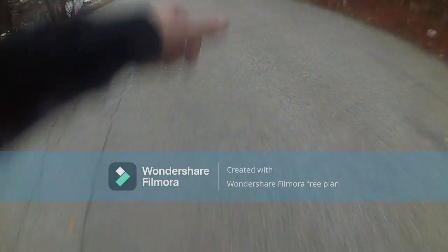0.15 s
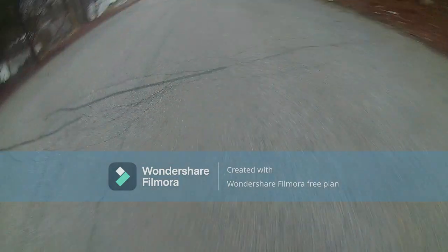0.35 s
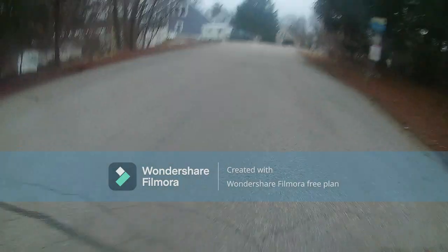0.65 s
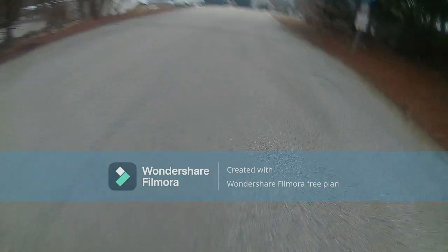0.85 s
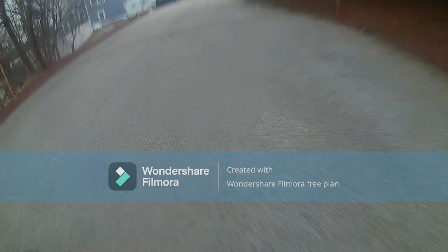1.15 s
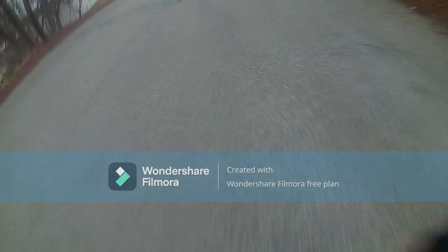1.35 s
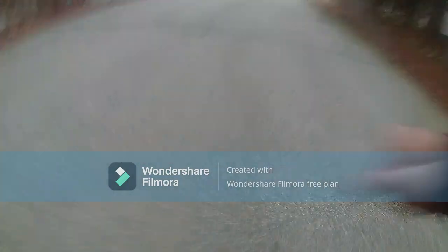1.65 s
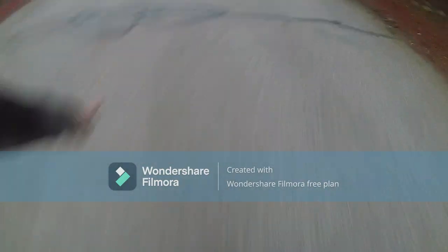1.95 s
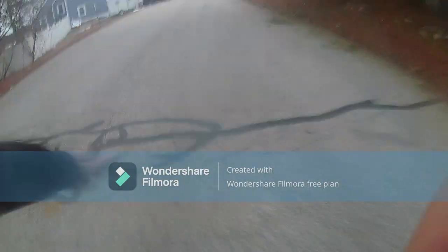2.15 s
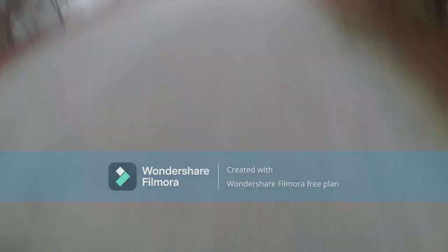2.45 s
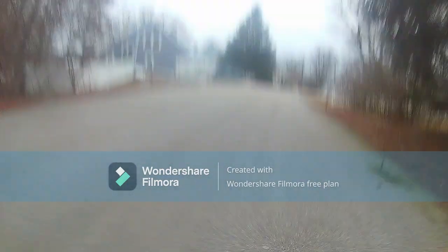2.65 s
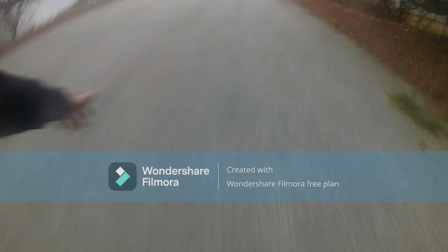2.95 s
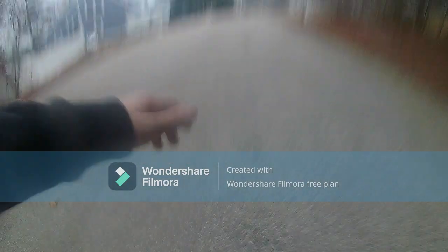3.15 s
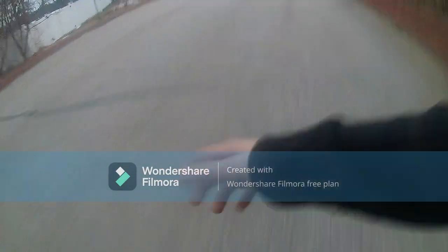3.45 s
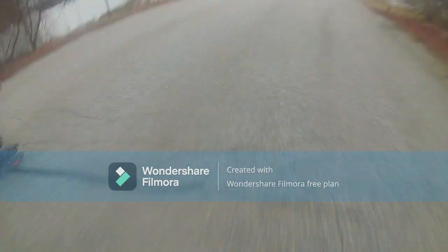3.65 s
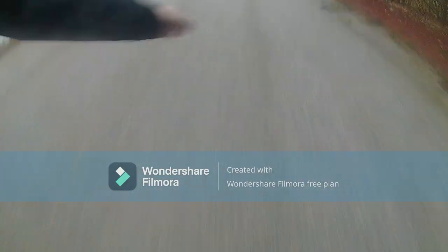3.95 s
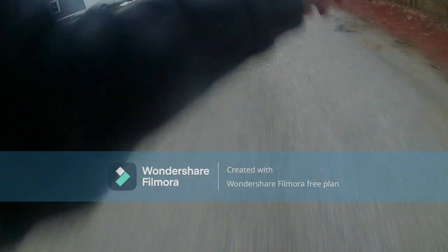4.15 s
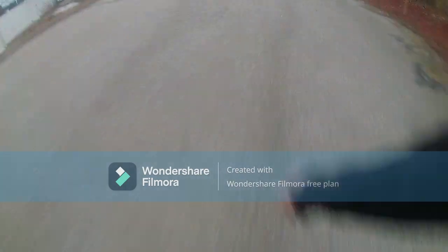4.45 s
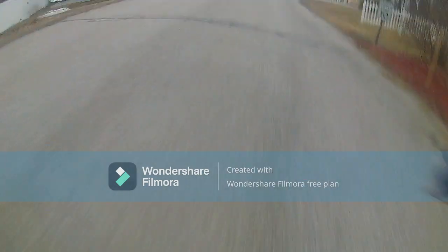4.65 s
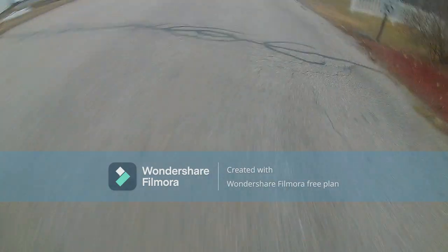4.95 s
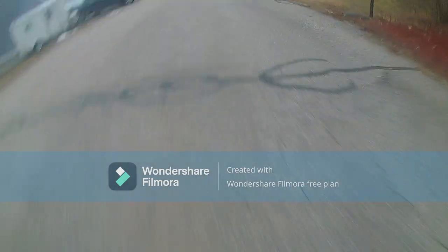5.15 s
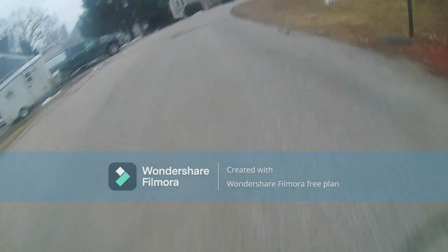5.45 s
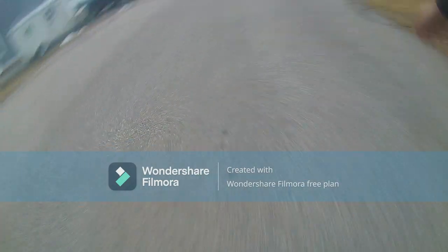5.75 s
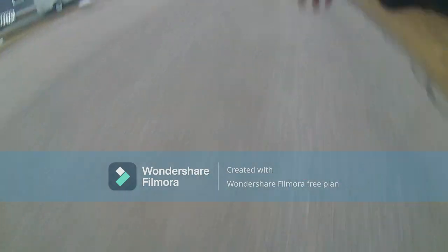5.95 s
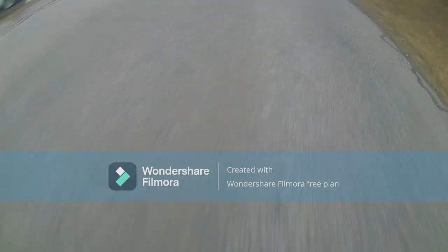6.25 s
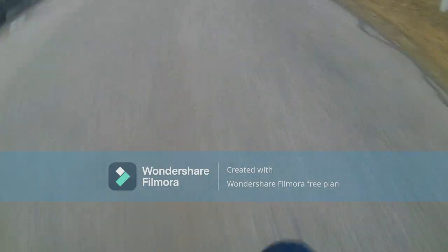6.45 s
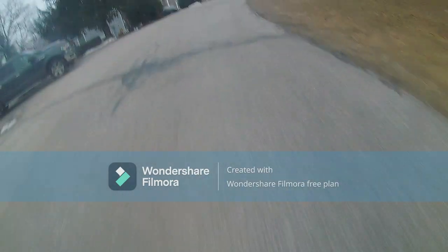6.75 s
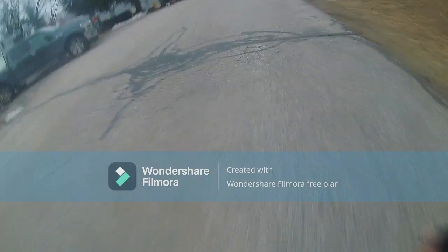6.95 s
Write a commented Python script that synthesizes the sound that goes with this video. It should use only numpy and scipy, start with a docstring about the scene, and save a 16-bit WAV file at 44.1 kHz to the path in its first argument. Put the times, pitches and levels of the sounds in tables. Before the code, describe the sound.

Inline skates roll fast over coarse outdoor asphalt, heard close and dry from a camera on the skater's body. A granular midrange roar is continuous, with bright fluttering sizzle swelling in pushes around 0.6, 1.4-2.4, 2.9, 3.7, 4.7 and 5.9 seconds, plus faint ticking stones. Brief scraping skids come near 0.6, 3.0, 4.55 and 6.3. Low air rumble gusts, strongest around 2.1-2.6. Dry thumps with hollow plastic clacks strike at 1.1 and 1.7; near 2.05 a loud cloth scrape and rapid chatter meet a swell of roar over cracks, with jolts continuing to a clipped blow at 2.53. Another hard clack hits at 2.93, then lighter ones to 3.2. Sparse knocks follow at 3.65, 4.07 and 4.72. A higher whir rises near 5.3; a hard cluster lands at 6.63-6.7, then rolling continues to about 7.1.

```python
"""Inline skates on cracked asphalt

Inline skates roll fast over coarse asphalt, heard from a camera worn on the skater's body.
Random grit impacts through resonances make the wheels roar, whir, sizzle and skid; loose stones tick.
Jolts strike decaying modes of the camera's mount and plastic case; gritty noise strokes are cloth on it.
Low noise and slow pulses are air at the microphone; the hardest blows clip."""
import sys
import numpy as np
from scipy import signal
from scipy.fft import rfft, irfft, next_fast_len
from scipy.io import wavfile
from scipy.ndimage import uniform_filter1d, map_coordinates

SR = 44100
rng = np.random.default_rng(int(sys.argv[2]) if len(sys.argv) > 2 else 0)


def generate_wav(sig):
    """Save sig (samples, or channels by samples) to the path in sys.argv[1] as 16-bit PCM at SR."""
    pcm = np.round(np.clip(np.atleast_2d(sig).T, -1, 1) * 32767).astype(np.int16)
    wavfile.write(sys.argv[1], SR, pcm)


N = 313551
T_S = np.arange(N) / SR


def amp(db):
    """Decibels to a linear gain."""
    return 10 ** (np.asarray(db) / 20)


def unit(x):
    """x scaled to rms 1."""
    return x / np.sqrt(np.mean(x ** 2) + 1e-20)


def wobble(knots_per_s):
    """A smooth random curve through normally distributed knots."""
    knots = rng.standard_normal(int(N * knots_per_s / SR) + 4)
    return map_coordinates(knots, [T_S * knots_per_s])


def filtered(x, response):
    """x times a response of frequency in Hz."""
    m = next_fast_len(N + 8192)
    return irfft(rfft(x, m) * response(np.fft.rfftfreq(m, 1 / SR)), m)[:N]


def spectrum_gain(hz, points):
    """Gain read off (Hz, dB) points, on a log frequency axis."""
    points_hz, points_db = np.transpose(points)
    return amp(np.interp(np.log(hz + 1), np.log(points_hz), points_db))


def coloured(x, points):
    """x shaped by (Hz, dB) points, at rms 1."""
    return unit(filtered(x, lambda hz: spectrum_gain(hz, points)))


def resonant(x, peaks):
    """x through steep-sided resonances summed in power, at rms 1."""
    def response(hz):
        power = 0
        for centre_hz, width_hz, db in peaks:
            power = power + amp(2 * db) / (1 + ((hz - centre_hz) / width_hz * 0.93) ** 2) ** 4
        return np.sqrt(power)
    return unit(filtered(x, response))


def grit(hits_per_s):
    """Tiny impacts of uneven size at random times, at rms 1."""
    size = amp(3 * rng.standard_normal(N))
    hit = rng.random(N) < hits_per_s / SR
    return unit(hit * rng.standard_normal(N) * size)


def mottled(x, depth_db):
    """x with its colour shifting at random every 12 ms or so, as the point of contact moves; rms 1."""
    z = signal.stft(x, nperseg=256)[2]
    field = uniform_filter1d(rng.standard_normal(z.shape), 4, 0)
    field = uniform_filter1d(field, 4, 1)
    return unit(signal.istft(z * amp(depth_db * unit(field)), nperseg=256)[1][:N])


def strokes(rows, edge_s):
    """A gain that opens and closes on linear ramps for each (s, length s, dB) stroke."""
    gain = np.zeros(N)
    for start_s, length_s, db in rows:
        inside_s = np.minimum(T_S - start_s, start_s + length_s - T_S)
        gain += amp(db) * np.clip(inside_s / edge_s + .5, 0, 1)
    return gain


PUSH_ATTACK_S, PUSH_RELEASE_S, EDGE_DEPTH_DB = 0.075, 0.089, 18.5  # times to rise and fall by the depth


def swells(rows):
    """A gain that rises, holds and dies away exponentially for each (s, length s, dB) stroke of a skate."""
    gain = np.zeros(N)
    for start_s, length_s, db in rows:
        before = np.maximum(start_s - T_S, 0) / PUSH_ATTACK_S
        after = np.maximum(T_S - start_s - length_s, 0) / PUSH_RELEASE_S
        gain += amp(db - EDGE_DEPTH_DB * (before + after))
    return gain


def struck(modes, scatter_db, detune):
    """One blow on decaying modes (Hz, dB, t60 s), each at a new strength and slightly new pitch."""
    t = np.arange(SR // 2) / SR
    hz, db, t60_s = np.transpose(modes)[:, :, None]
    size, shift = rng.standard_normal((2, len(modes), 1))
    decay = amp(db + scatter_db * size - 60 * t / t60_s)
    return np.sum(decay * np.cos(2 * np.pi * hz * (1 + detune * shift) * t), axis=0)


def contact(x, length_s):
    """Soften a blow by a smooth push of this length; peak 1."""
    u = np.clip(np.arange(400) / SR / length_s, 0, 1)
    y = np.convolve(x, np.sin(np.pi * u) ** 2)[:len(x)]
    return y / np.abs(y).max()


def add(track, start_s, x):
    """Mix x into the track at a time."""
    i = max(round(start_s * SR), 0)
    track[i:i + len(x)] += x[:N - i]


# Wheels and frames. Each row: frequency in Hz, relative spectrum level in dB.
ROAR_SPECTRUM = [(90, 6.5), (130, 4.5), (260, 3), (400, 2), (650, -1.5), (1050, -2.5), (1310, 3.5),
                 (1600, -9), (1900, -1.5), (2300, -16), (2550, -14), (2900, -29), (4100, -32), (6000, -42),
                 (11000, -86)]


def roar(roar_db, patches):
    """Grit drums on wheels and frames; coarse patches swell it and single stones stand out."""
    drumming = mottled(coloured(grit(hits_per_s=3000), ROAR_SPECTRUM), depth_db=2)
    stones = wobble(130)
    return amp(roar_db + 1.02 + 1.04 * patches + 0.68 * stones) * drumming


# High resonances of the skates. Each row: frequency in Hz, width in Hz, relative level in dB.
WHIR_PEAKS = [(3320, 200, -5), (4070, 510, -14.5)]
# Glides in which one skate whirs loudly. Each row: start in seconds, length in seconds, level in dB.
GLIDES = [(5.23, .25, -64.5), (6.54, 0.18, -67)]
WHIR_DB, WHIR_DB_PER_ROAR_DB, WHIR_PATCH_DB = -69.5, 0.97, 2.8  # at average load; growth; patch swing


def whir(load_db, patches):
    """Grit excites high skate resonances, louder with load and in the glides."""
    level = amp(WHIR_DB + WHIR_DB_PER_ROAR_DB * load_db) + swells(GLIDES)
    return level * amp(WHIR_PATCH_DB * patches) * resonant(grit(hits_per_s=5900), WHIR_PEAKS)


# Higher resonances of the skates. Each row: frequency in Hz, width in Hz, relative level in dB.
SIZZLE_PEAKS = [(2566, 250, -2.5), (3830, 560, -11), (4860, 370, -0.5), (5520, 300, -10),
                (6530, 420, -16.5), (7230, 390, -19.5), (8450, 230, -21), (9560, 280, -20.5)]
# Pushes on a skate's edge. Each row: start in seconds, length in seconds, relative sizzle level in dB.
PUSHES = [(-.05, 0.31, -61.5), (.55, 0.43, -62.5), (1.42, 1, -62.5), (2.86, 0.15, -57), (3.64, .63, -63),
          (4.7, 0.59, -61), (5.88, 0.48, -60.5), (6.97, 0.17, -71)]
UPRIGHT_DB, SIZZLE_DB_PER_ROAR_DB = -79, 0.58  # relative sizzle of an upright wheel; growth with load


def sizzle(load_db, patches):
    """A skate on its edge excites a comb of high resonances that flutter."""
    edging = swells(PUSHES) + amp(UPRIGHT_DB)
    flutter = amp(2.5 * wobble(70) + 1.8 * wobble(12))
    level = edging * flutter * amp(SIZZLE_DB_PER_ROAR_DB * load_db - 2.5 + 3.0 * patches)
    return level * mottled(resonant(grit(hits_per_s=2400), SIZZLE_PEAKS), depth_db=4.5)


# A skidding wheel. Each row: frequency in Hz, width in Hz, relative level in dB.
SKID_PEAKS = [(1340, 700, 3), (1890, 190, 7.5), (4070, 1100, -25)]
# Brief skids on grit. Each row: start in seconds, length in seconds, level in dB.
SKIDS = [(.02, 0.026, -47.5), (.635, 0.019, -45), (2.995, 0.019, -42), (4.55, 0.059, -44),
         (5.34, 0.039, -49), (6.325, 0.031, -44)]


def skids():
    """A wheel slips over grit and excites its resonances in short strokes."""
    return strokes(SKIDS, edge_s=0.0041) * resonant(grit(hits_per_s=2200), SKID_PEAKS)


# Weight on the wheels and coarseness of the road. Each row: time in seconds, relative roar level in dB.
LOAD = [(0.03, -46), (0.3, -55), (0.62, -47.5), (0.84, -55.5), (1.0, -47.5), (1.25, -52), (1.85, -48.5),
        (2.1, -39.5), (2.75, -52.5), (3.0, -50), (3.35, -52), (3.9, -49), (4.04, -42.5), (4.4, -49.5),
        (5.3, -46.5), (5.6, -49), (5.95, -47), (7.11, -48)]
USUAL_ROAR_DB = -48.5  # on the scale of LOAD


def wheels():
    """All rolling sounds share one load and one pattern of coarse road patches."""
    roar_db = np.interp(T_S, *np.transpose(LOAD))
    load_db = roar_db - USUAL_ROAR_DB
    patches = wobble(22)
    return roar(roar_db, patches) + whir(load_db, patches) + sizzle(load_db, patches) + skids()


# Air on the microphone. Each row: frequency in Hz, relative spectrum level in dB.
RUMBLE_SPECTRUM = [(10, -11.5), (26, 3.5), (55, -3), (80, -22), (120, -19.5), (180, -27), (350, -36.5),
                   (900, -61), (2500, -130)]
# Gusts as the body swings. Each row: centre in seconds, half width in seconds, relative level in dB.
GUSTS = [(1.1, 0.28, -35.5), (1.741, 0.073, -37), (2.151, 0.11, -27.5), (2.53, 0.11, -24.5),
         (3.0, 0.3, -32), (4.021, 0.057, -28), (4.55, 0.042, -36)]
# Slow shoves of air. Each row: start in seconds, swing time in seconds, peak in dB.
SHOVES = [(1.002, 0.014, -21.5), (1.225, 0.01, -21.5), (2.068, 0.0061, -0.5), (2.276, 0.0074, -8),
          (2.527, 0.004, 7.5), (2.59, 0.014, -19), (3.08, 0.031, -18.5)]
BREEZE_DB, SWAY_DB = -38, 3  # steady rumble, on the scale of GUSTS, and its slow swing


def air():
    """Low noise sways and gusts with the body; slow pulses are shoves of air, over a faint hiss."""
    flow = amp(BREEZE_DB + SWAY_DB * wobble(3.7))
    for centre_s, half_width_s, db in GUSTS:
        flow += amp(db) * np.exp(-((T_S - centre_s) / half_width_s) ** 2)
    out = flow * amp(-1.5 + 1.0 * wobble(13)) * coloured(rng.standard_normal(N), RUMBLE_SPECTRUM)
    for start_s, swing_s, db in SHOVES:
        u = np.arange(SR // 4) / SR / swing_s
        shove = (1 - u) * np.exp(-u) * (1 - np.exp(-u * u * 6))
        add(out, start_s, amp(db) * contact(shove, length_s=0.00085))
    hiss = amp(-75.5) * rng.standard_normal(N)
    return out + hiss


# Sharp edge of a knock or stone. Each row: frequency in Hz, relative spectrum level in dB.
TICK_SPECTRUM = [(1800, -2.5), (2700, 3), (3300, -6.5), (4150, -12), (4650, -18.5), (5500, -22),
                 (7000, -29), (15000, -31)]


def tick(t60_s):
    """A coloured noise snap that decays 60 dB in t60; peak 1."""
    t = np.arange(2048) / SR
    burst = np.roll(rng.standard_normal(len(t)) * amp(-60 * t / t60_s), 20)
    y = irfft(rfft(burst) * spectrum_gain(np.fft.rfftfreq(len(t), 1 / SR), TICK_SPECTRUM))
    return y / np.abs(y).max()


STONES_PER_S, STONE_PEAK_DB = 6, -45  # mean rate; peak of the hardest stone


def pebbles():
    """Now and then a wheel ticks over a loose stone; all ticks share one snap."""
    hits = (rng.random(N) < STONES_PER_S / SR) * rng.uniform(.3, 1, N)
    return amp(STONE_PEAK_DB) * signal.fftconvolve(hits, tick(t60_s=0.015))[:N]


# Knocks of the case in its mount. Each row: start in seconds, then relative thump, clack and tick in dB.
KNOCKS = [(0.089, -20, -38, -56), (0.669, -28, -23.5, -52), (1.081, -15, -18.5, -30),
          (1.102, -9.5, -11, -22.5), (1.1247, -2.5, -10, -31), (1.467, -43, -32, -32.5),
          (1.641, -14.5, -22, -46), (1.651, -28, -22, -57), (1.7115, 0, -29, -34.5),
          (1.738, -4.5, -11.5, -29.5), (2.069, -3, -30, -36.5), (2.098, -20, -13, -45.5),
          (2.109, -10.5, -23, -49), (2.121, -28, -19, -34), (2.152, -11.5, -10.5, -42),
          (2.17, -7, -21, -39), (2.206, -2.5, -28, -22.5), (2.294, -14, -22, -39.5),
          (2.378, -25, -20.5, -46), (2.4851, -9, -13.5, -34), (2.528, -1, -7.5, -11.5),
          (2.5658, -23, -18.5, -29), (2.629, -26.5, -30.5, -42), (2.887, -19.5, -13, -42),
          (2.894, -41, -11, -16), (2.932, 0, -4, -13.5), (3.11, -17.5, -11, -35), (3.19, -1, -19, -24.5),
          (3.598, -18, -22.5, -40), (3.6512, -9.5, -33, -37), (4.0651, -10.5, -20.5, -33),
          (4.0693, -37, -9.5, -48.5), (4.7225, -13.5, -11.5, -25), (6.058, -11.5, -53, -57),
          (6.467, -48, -26.5, -41.5), (6.631, -13.5, -22, -26), (6.6377, -31, -10, -34.5),
          (6.646, -1, -7.5, -19.5), (6.697, -7, -14, -53), (7.022, -22, -22, -60)]
# Camera rocking on its mount. Each row: frequency in Hz, relative level in dB, t60 in seconds.
MOUNT_MODES = [(121.4, -3, 0.084), (156.7, -3, 0.028), (243.7, -1.5, 0.032), (514, -7, 0.023)]
# Faint ring of the mount. Each row: frequency in Hz, relative level in dB, t60 in seconds.
RING_MODES = [(199, 0, .3), (345, -16, .8)]
# Small hard part of the case. Each row: frequency in Hz, relative level in dB, t60 in seconds.
PING_MODES = [(3720, 4.5, 0.0099), (4120, -5.5, 0.017)]
# Plastic case. Each row: frequency in Hz, relative level in dB, t60 in seconds.
CASE_MODES = [(546, -9.5, 0.031), (796, -19, 0.022), (1030, -4, 0.017), (1196, -6, 0.018),
              (1408, 2.5, 0.016), (1797, 2, 0.016)]


def knocks():
    """Each jolt rocks the camera on its soft mount and clacks the case, which rebounds."""
    out = np.zeros(N)
    for start_s, thump_db, clack_db, tick_db in KNOCKS + chatter(count=5):
        early, gap, size, late = rng.random(4)
        rock = contact(struck(MOUNT_MODES, scatter_db=1.5, detune=.04), length_s=0.0031)
        add(out, start_s, amp(thump_db - 0.7) * rock)
        # only blows strong in all three parts wake the long ring
        ring = contact(struck(RING_MODES, scatter_db=1, detune=.003), length_s=.0015)
        add(out, start_s, amp(thump_db + 2 * clack_db + tick_db + 0.5) * ring)
        ping = contact(struck(PING_MODES, scatter_db=3, detune=.03), length_s=.00025)
        add(out, start_s, amp(tick_db - 3.5) * ping)
        touches = [(-.002 - .005 * early, -20),  # light lead-in: delay s, dB
                   (0, 0),  # the blow
                   (0.00124 + 0.00276 * gap, -4 - 8 * size),  # first rebound
                   (0.0063 + 0.0081 * late, -19)]  # second rebound
        for delay_s, db in touches:
            clack = contact(struck(CASE_MODES, scatter_db=3, detune=.06), length_s=0.00076)
            add(out, start_s + delay_s, -amp(clack_db + db + 2.5) * clack)
            add(out, start_s + delay_s, amp(tick_db + db + 1.0) * tick(t60_s=0.018))
    return out


# Cloth on the case. Each row: frequency in Hz, relative spectrum level in dB.
RUB_SPECTRUM = [(100, -11.5), (300, 6), (700, -2.5), (1500, 2), (2100, -2.5), (2550, -5), (3200, -14),
                (4200, -2), (5600, -16.5), (7200, -32.5), (15000, -40.5)]
# Cloth rubbing on the case. Each row: start in seconds, length in seconds, relative level in dB.
SCRAPES = [(.553, .016, -42), (2.041, 0.033, -19), (2.085, 0.19, -47), (2.241, 0.046, -28),
           (2.373, 0.041, -34.5), (2.455, 0.087, -36), (2.884, 0.034, -25.5), (3.953, .012, -41),
           (4.778, 0.024, -45)]


def cloth():
    """Fabric sticks and slips across the case in gritty strokes, and rustles dully at each knock."""
    rub = mottled(coloured(grit(hits_per_s=6000), RUB_SPECTRUM), depth_db=4)
    # treble above 4.4 kHz falls to a -12 dB shelf
    dull = filtered(rub, lambda hz: np.maximum(1 / (1 + (hz / 4400) ** 20), amp(-12)))
    slips = amp(2.5 * wobble(160))
    shifts = [(s - .009, .027, max(thump_db, clack_db) - 38.5) for s, thump_db, clack_db, _ in KNOCKS]
    shifting = strokes(shifts, edge_s=.022)
    scraping = amp(-2.5) * strokes(SCRAPES, edge_s=.012)
    return slips * (scraping * rub + shifting * dull)


# Light knocks over a web of cracks. One row: mean relative thump, clack and tick in dB.
CHATTER_DB = (-25.5, -22.5, -34)
CRACKS_FROM_S, CRACKS_TO_S, CHATTER_SCATTER_DB = 2.075, 2.1, 3


def chatter(count):
    """Rows of light knocks, unevenly spaced, while the wheels cross the cracks."""
    place = (np.arange(count) + rng.random(count)) / count
    start_s = CRACKS_FROM_S + place * (CRACKS_TO_S - CRACKS_FROM_S)
    levels_db = np.array(CHATTER_DB) + CHATTER_SCATTER_DB * rng.standard_normal((count, 3))
    return list(np.column_stack([start_s, levels_db]))


def scene():
    """Skates, air, stones, knocks and clothing, summed at one microphone."""
    return (wheels() + air() + pebbles() + knocks() + cloth())[None]


TOP_HZ = 16050


def record(dry):
    """The camera clips at full scale, then keeps nothing above its band limit."""
    clipped = np.clip(dry[0], -1, 1)
    return filtered(clipped, lambda hz: hz < TOP_HZ)[None]


dry = scene()
out = record(dry)
generate_wav(out)
```